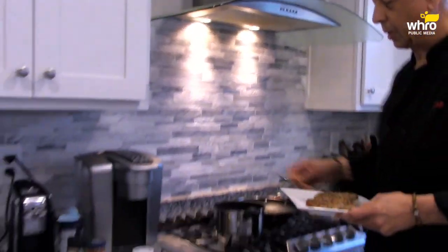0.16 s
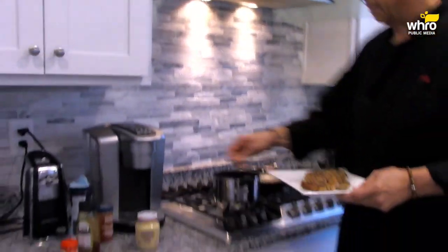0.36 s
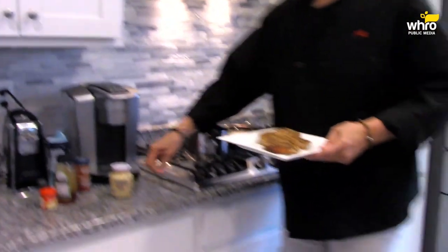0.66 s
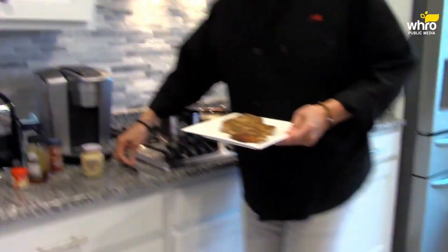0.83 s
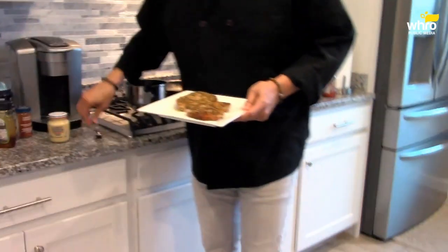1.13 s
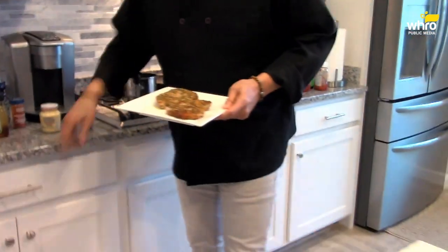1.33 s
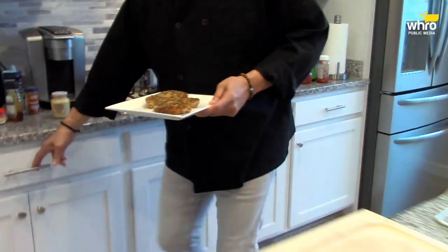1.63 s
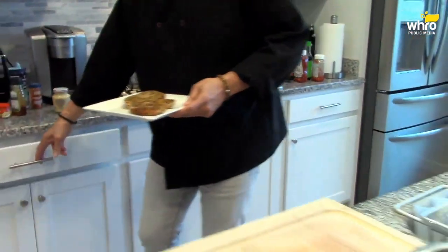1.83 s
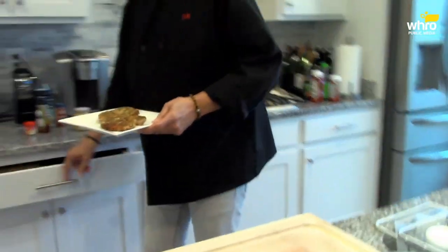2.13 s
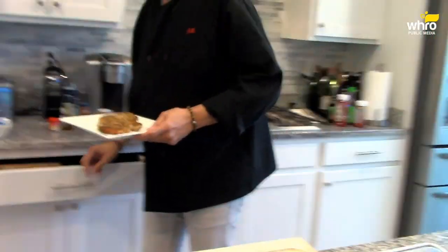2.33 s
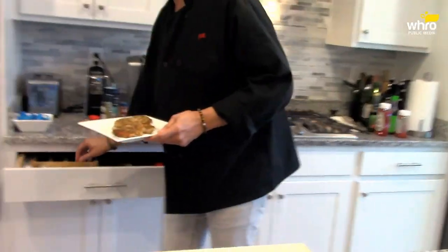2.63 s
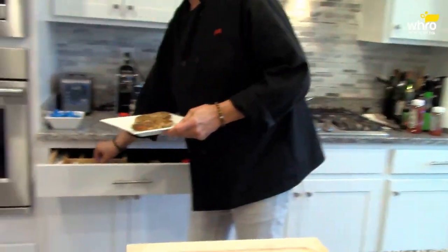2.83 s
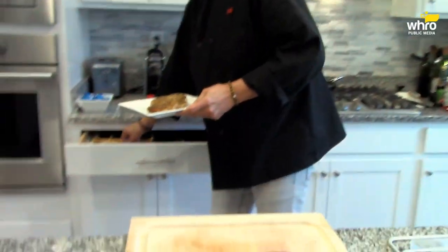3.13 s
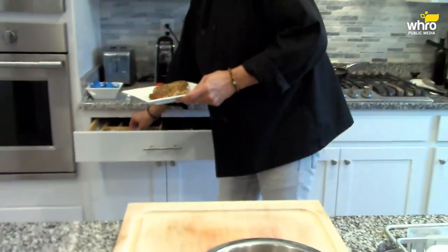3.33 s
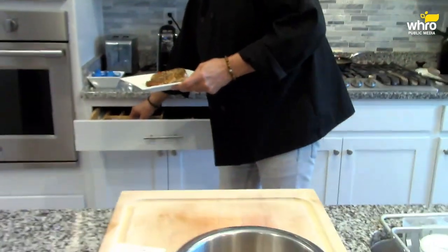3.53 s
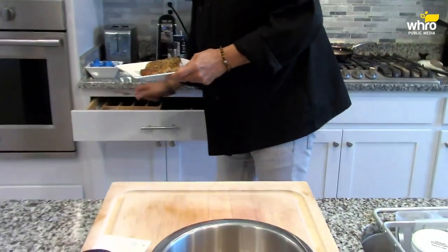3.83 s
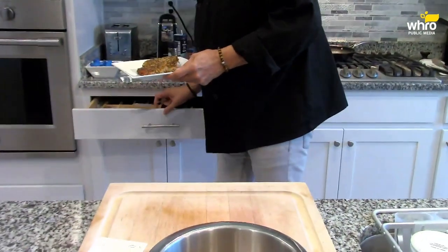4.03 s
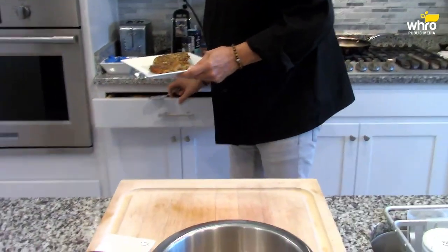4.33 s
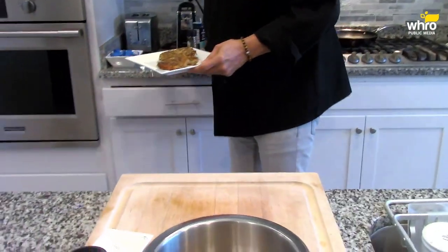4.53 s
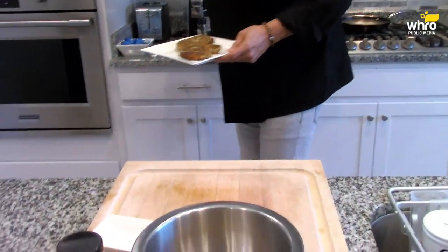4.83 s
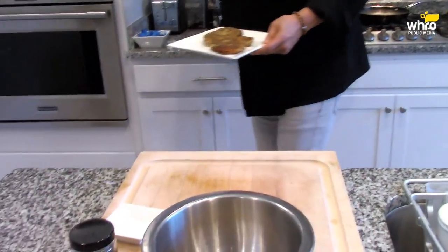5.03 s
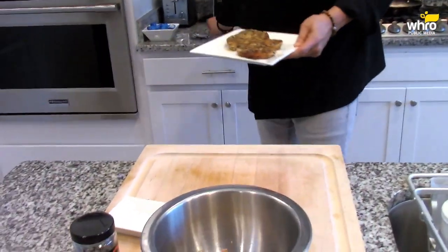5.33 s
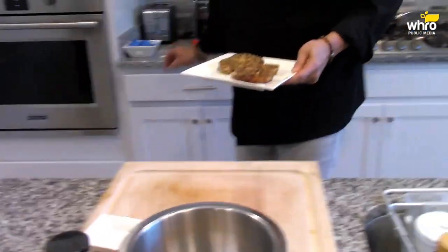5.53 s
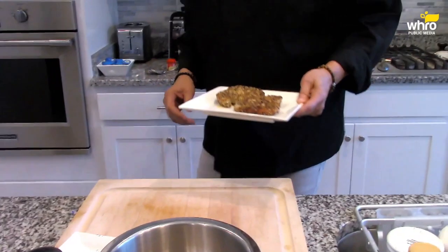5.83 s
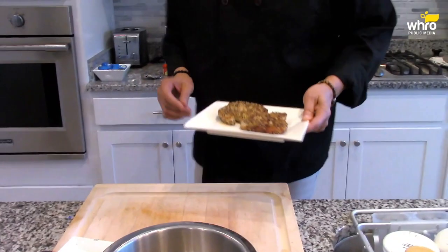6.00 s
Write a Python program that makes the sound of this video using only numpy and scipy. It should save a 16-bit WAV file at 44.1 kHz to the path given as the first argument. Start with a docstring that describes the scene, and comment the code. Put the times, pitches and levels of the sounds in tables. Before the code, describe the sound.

A soft, constant fan rush fills a reflective kitchen. After light touches near the stove, a fork drops in a quick double clink, then comes a dry finger snap. A drawer rolls out hollowly, utensils tumble in a dense metallic rattle, and after a short lull the drawer rolls in and slams, its contents jangling. A spoon then bounces to rest with bright, brief ringing. The microphone is a few steps off, image almost mono.

```python
"""A cooker hood hums in a hard-walled kitchen, with soft rustles and light metal notes that ping by the stove.
A few steps away a cook drops a fork on the stone counter, snaps his fingers and rolls a drawer open.
He rummages in the cutlery, takes out a spoon, lets the drawer crash shut and sets the spoon down ringing.
Blows are short random rattles coloured by the struck body; steel adds fading sine waves; the drawer's
rolling and the hood are shaped noise. Every blow and the rolling drawer get kitchen echoes."""
import sys
import numpy as np
from scipy import signal
from scipy.fft import rfft, irfft, next_fast_len
from scipy.io import wavfile

SR = 44100
rng = np.random.default_rng(int(sys.argv[2]) if len(sys.argv) > 2 else 0)


def generate_wav(sig):
    """Save sig (samples, or channels by samples) to the path in sys.argv[1] as 16-bit PCM at SR."""
    pcm = np.round(np.clip(np.atleast_2d(sig).T, -1, 1) * 32767).astype(np.int16)
    wavfile.write(sys.argv[1], SR, pcm)


N = 271923   # length of the scene in samples
TAIL = np.arange(int(.7 * SR)) / SR   # time in seconds within one echo or ring
# Levels are set before the box resonances, the small trim of each output channel and the peak rounding.
BLOW_SAMPLES = .04 * SR   # a blow's or ping's dB is its average (rms) level if packed into 40 ms

# Knocks of the drawer: first the hand on its handle, then bumps in the runners.
# Each row: start in seconds, level in dB, length in seconds.
DRAWER_KNOCKS = [(1.824, -40.5, 0.0033), (1.998, -36.5, 0.031), (2.15, -40.5, 0.02), (2.432, -34, .014),
                 (2.552, -36.5, 0.01), (2.781, -39, 0.022), (4.184, -43, 0.014), (4.211, -29, 0.016),
                 (4.302, -32, 0.025)]
KNOCK_BASS_DB, KNOCK_TREBLE_DB = -1, -15
# Dull thuds as the drawer's weight starts or stops. Each row: start in seconds, level in dB, length in seconds.
DRAWER_THUDS = [(1.946, -44, .07), (2.988, -51, 0.022), (4.07, -53.5, .015), (4.205, -48, 0.03),
                (4.745, -50, .03), (4.92, -28.5, 0.018)]
THUD_BASS_DB, THUD_TREBLE_DB = 21, -22
# Tone of the drawer's cabinet. Each row: frequency in Hz, strength in dB per Hz (only the shape counts).
CABINET_TONE = [(45, -27.5), (110, -16), (170, -14.5), (400, -5.5), (600, -10.5), (1000, -9), (1700, -10),
                (2400, -10.5), (4500, -10.5), (7000, -10.5), (9300, -14.5), (11500, -19.5), (13000, -26.5),
                (16000, -22)]
# Tone of the rolling runners. Each row: frequency in Hz, strength in dB per Hz (only the shape counts).
RUNNER_TONE = [(29, -85), (50, -39), (125, -7), (212, -8.5), (251, 4.5), (324, -3.5), (368, -3.5),
               (418, -4.5), (898, -8.5), (1810, -19.5), (3210, -22.5), (8000, -74), (10400, -72),
               (17600, -120)]


def drawer():
    """Rollers rumble along the runners; the drawer knocks, thuds and crashes shut with all that is in it."""
    happens = rng.random(N) < 3000 / SR   # 3000 tiny bumps a second on average
    grains = happens * rng.choice([-1, 1], N) * from_db(3 * rng.standard_normal(N))
    path = kitchen(direct_db=-8, near_db=0, near_s=.012)
    rumble = signal.fftconvolve(grains, path)[:N]
    rumble = rms_one(colour(rumble, lambda hz: at_hz(RUNNER_TONE, hz)))
    rumble = from_db(1.5) * drawer_speed() * rumble
    knocks = [(s, db, KNOCK_BASS_DB, KNOCK_TREBLE_DB, length) for s, db, length in DRAWER_KNOCKS]
    thuds = [(s, db, THUD_BASS_DB, THUD_TREBLE_DB, length) for s, db, length in DRAWER_THUDS]
    hits = knocks + thuds + slam()
    return rumble + blows(hits, CABINET_TONE, direct_db=-3.5, near_db=-1.5, near_s=0.025)


# The hand pushes or pulls the drawer. Each row: start in seconds, rumble level in dB before slowing and
# before the 1.5 dB boost in drawer(), rolling time in seconds.
PUSHES = [(1.74, -59, .14), (1.86, -48, 0.3), (2.13, -43.5, .57), (2.76, -50.5, 0.31), (2.96, -47.5, .11),
          (4.0, -55, 0.18), (4.18, -39, .55), (4.73, -51.5, 0.21)]
PUSH_S, FRICTION_DB_PER_S, STOP_S = 0.044, 25.5, 0.025   # it gathers speed, coasts down, comes to rest


def drawer_speed():
    """Each push brings the drawer up to speed; friction slows it until it stops; overlapping pushes add up."""
    speed = np.zeros(N)
    for s, db, length in PUSHES:
        t = np.arange(N) / SR - s
        starting = np.clip(t / PUSH_S, 0, 1)
        stopping = np.clip(1 - (t - length) / STOP_S, 0, 1)
        coasting = from_db(db - FRICTION_DB_PER_S * np.maximum(t - PUSH_S, 0))
        speed += starting * stopping * coasting
    return speed


# The drawer hits its stop. In order: start in seconds, level in dB, extra bass in dB, extra treble in dB.
SLAM = (4.898, -15, 0, -4)
# What each wave loses against the one before. In order: level in dB, bass in dB, treble in dB.
WAVE_LOSS = (0.03, 2.8, 1)
WAVE_GAP_S, WAVE_S, WAVE_GROWTH = .022, 0.03, 1.29   # first gap and length; both grow by this factor


def slam(count=4):
    """The contents crash against the front in waves that spread out and grow thinner and duller."""
    s, hits = SLAM[0], []
    for k in range(count):
        growth = WAVE_GROWTH ** k
        levels_db = np.array(SLAM[1:]) - k * np.array(WAVE_LOSS)
        hits.append((s, *levels_db, WAVE_S * growth))
        s += WAVE_GAP_S * growth
    return hits


# Hollow notes of the drawer box. Each row: frequency in Hz, width in Hz, boost in dB.
BOX_RESONANCES = [(168, 26, 10), (416, 18, 5), (788, 30, 5), (983, 24, 7), (1130, 26, 6), (1540, 60, 3)]


def box(x):
    """The wooden drawer adds its hollow resonances to its rolling, knocks and crash and the tumbling cutlery."""
    def boost_db(f):
        return sum(db / (1 + (2 * (f - hz) / width) ** 2) for hz, width, db in BOX_RESONANCES)
    return colour(x, boost_db)


# Notes of the drawer cutlery. Each row: frequency in Hz before the piece's pitch ratio, level in dB before
# the blow's ring level and a random change, time to fade by 60 dB in seconds before the heap halves it.
CUTLERY_MODES = [(2840, -69, 0.21), (4240, -63, 0.18), (4000, -70, 0.22), (5240, -75, 0.27),
                 (5360, -58, 0.28), (6800, -56, 0.31), (6560, -68, 0.23), (8400, -49.5, 0.057),
                 (8340, -66, 0.21), (9000, -53, 0.098), (10500, -57, 0.25), (11800, -64, 0.19),
                 (11700, -61, 0.25), (12300, -64, 0.2), (13700, -67, 0.2), (14470, -63, 0.15)]
# Tone of the cutlery tray. Each row: frequency in Hz, strength in dB per Hz (only the shape counts).
TRAY_TONE = [(29, -70), (50, -38), (208, -20), (246, -10), (842, -4), (973, 0), (1330, -6), (1660, -4.5),
             (1960, -9), (2880, -7), (3250, -13), (5810, -14.5), (7210, -18.5), (10900, -20), (16000, -31)]


def cutlery():
    """Utensils tumble against each other and their tray; each rings at its own pitch, damped by the heap."""
    def modes_for(blow):
        pitch = blow[6]
        return [(hz * pitch, db + rng.normal(0, 2), t60 / 2) for hz, db, t60 in CUTLERY_MODES]
    return blows(tumbles(), TRAY_TONE, direct_db=-2.0, near_db=2.5, near_s=0.024, modes_for=modes_for)


# Utensils tumble. Each row: start in seconds, contact level in dB, extra treble in dB, ring level in dB,
# pitch ratio of the piece.
CUTLERY_BLOWS = [(2.951, -32.5, -5.5, -27, 1.1), (3.066, -33, 9, -21, 1.2), (3.11, -34, -6, -11, 0.63),
                 (3.133, -25.5, -13, -28, 0.8), (3.199, -36, 2, -1, .82), (3.235, -18, 7, -14, 1.1),
                 (3.283, -23, 8.5, -3, 1.2), (3.34, -25.5, 10.5, -15, 1.3), (3.355, -19, 3, 0, .98),
                 (3.437, -17.5, -0.5, -2, 1), (3.492, -20, -19, 3, .75), (3.611, -21, 4, -1, 0.68),
                 (3.706, -21.5, 7, 13, 1.2)]
TUMBLE_DB, TUMBLE_S, TUMBLE_BASS_DB = -20.5, .018, 4   # a typical tumble: its level, length and extra bass
TUMBLE_DOUBLES_DB, TUMBLE_BASS_PER_DB = 14.5, 1   # this many dB double the length; bass dB per dB of level
SETTLE_AFTER_S, SETTLE_LOSS_DB, SETTLE_S = .042, 17.5, 0.039   # delay, drop in level and length of settling


def tumbles():
    """Weight, taken from the level, sets each tumble's length and bass; a soft rattle follows as it settles."""
    hits = []
    for s, db, treble_db, ring_db, pitch in CUTLERY_BLOWS:
        weight_db = db - TUMBLE_DB
        bass_db = TUMBLE_BASS_DB + TUMBLE_BASS_PER_DB * weight_db
        length = TUMBLE_S * 2 ** (weight_db / TUMBLE_DOUBLES_DB)
        hits.append((s, db, bass_db, treble_db, length, ring_db, pitch))
        soft_db, soft_ring_db = db - SETTLE_LOSS_DB, ring_db - SETTLE_LOSS_DB
        hits.append((s + SETTLE_AFTER_S, soft_db, bass_db, treble_db, SETTLE_S, soft_ring_db, pitch))
    return hits


# Notes of the spoon. Each row: frequency in Hz, level in dB struck on the handle, level in dB struck on the
# bowl (both before the blow's ring level), time to fade by 60 dB in seconds before the grip shortens it.
SPOON_MODES = [(2657, -37, -32, .25), (2842, -39, -37, .35), (3662, -39, -30, .24), (3700, -39, -28, .08),
               (3860, -42, -36, .15), (5038, -31, -39, .65), (5141, -47, -35, .3), (6290, -25, -24, .18),
               (6335, -45, -35, .3), (7560, -45, -41, .35), (8125, -48, -28, .13), (8195, -48, -26, .2),
               (8843, -30, -28, .14), (9274, -40, -19, .19), (10662, -43, -25, .08), (12300, -43, -31, .14),
               (12810, -39, -45, .2), (13560, -50, -42, .25), (13920, -47, -42, .22), (14110, -41, -55, .2)]
# Tone of steel hitting stone. Each row: frequency in Hz, strength in dB per Hz (only the shape counts).
STEEL_ON_STONE = [(50, -26), (130, -13), (280, 0.5), (700, 3), (1300, 1), (2000, -1), (3500, 1.5),
                  (7000, -1.5), (11000, -1), (15000, -18)]


def spoon(grip=1.1):
    """The spoon is knocked, jolted, then bounces to rest; the place struck decides which notes speak."""
    def modes_for(blow):
        place = np.clip(blow[6], 0, 1)
        damping = grip * (1 - place)   # fingers on the handle shorten the high modes most
        modes = []
        for hz, handle_db, bowl_db, t60 in SPOON_MODES:
            level_db = handle_db + place * (bowl_db - handle_db)
            modes.append((hz, level_db, t60 / (1 + damping * (hz / 6500) ** 2)))
        return modes
    return blows(spoon_hits(), STEEL_ON_STONE, direct_db=-4.5, near_db=5.0, near_s=0.03, modes_for=modes_for)


# The spoon is knocked, jolted by the drawer and set down, with one list of bounces for each.
# Each row: start in seconds, contact level in dB, extra treble in dB, ring level in dB,
# place struck from 0 (handle) to 1 (bowl).
SPOON_BLOWS = [
    [(4.821, -20.5, -1, 2.5, 0.13)],
    [(4.951, -26.5, 6, -1.5, 0.027)],
    [(5.293, -24, -1.5, 3.5, 0.96), (5.315, -24, -3.5, 3.5, 0.84), (5.347, -25, -1, -5.5, .06),
     (5.375, -23, -7, -9, 0.51)],
]
HANDLE_BASS_DB, BOWL_BASS_DB = 1, -6.5   # struck on the handle it thumps, on the bowl it hardly does
SPOON_RATTLE_S, SPOON_RATTLE_S_PER_S = 0.00093, 0.16   # first length, and growth per second of bouncing


def spoon_hits():
    """The place struck sets the thump; later bounces stay longer on the stone and chatter."""
    hits = []
    for bounces in SPOON_BLOWS:
        first_s = bounces[0][0]
        for s, db, treble_db, ring_db, place in bounces:
            bass_db = HANDLE_BASS_DB + place * (BOWL_BASS_DB - HANDLE_BASS_DB)
            length = SPOON_RATTLE_S + SPOON_RATTLE_S_PER_S * (s - first_s)
            hits.append((s, db, bass_db, treble_db, length, ring_db, place))
    return hits


# The two ends of the fork land. Each row: start in seconds, contact level in dB, rattle length in seconds.
FORK_BLOWS = [(.923, -32, 0.0018), (.958, -26, 0.0033)]
# Notes of the fork. Each row: frequency in Hz, level in dB before the blow's ring level,
# time to fade by 60 dB in seconds.
FORK_MODES = [(2778, -50, .3), (5012, -35, .25), (5766, -46, .2), (6336, -39, .2), (6480, -43, .12),
              (6848, -46, .15), (9211, -36, .14), (9604, -37, .09), (11390, -43, .1), (11510, -40, .1),
              (14150, -45, .08), (14300, -45, .1)]


def fork(treble_db=3.4, bass_db=2.0, ring_db=-.5):
    """The fork lands on the stone counter, one end after the other, and its steel rings."""
    hits = [(s, db, bass_db, treble_db, length, ring_db) for s, db, length in FORK_BLOWS]
    return blows(hits, STEEL_ON_STONE, direct_db=-7, near_db=3, near_s=.009,
                 modes_for=lambda blow: FORK_MODES)


# The finger leaves the thumb, then hits the palm. Each row: start in seconds, level in dB, length in seconds.
SNAP = [(1.597, -37, 0.0027), (1.6035, -30.5, 0.0013)]
# Tone of the palm. Each row: frequency in Hz, strength in dB per Hz (only the shape counts).
PALM_TONE = [(120, -44), (200, -16), (263, -12), (482, -39), (538, -10.5), (659, 0), (722, -9), (883, -9.5),
             (2090, -10), (3560, 1), (11700, -20.5), (16000, -30)]


def finger_snap():
    """A finger slips off the thumb and hits the palm: two very short rattles with the palm's tone."""
    hits = [(s, db, 0, 0, length) for s, db, length in SNAP]
    return blows(hits, PALM_TONE, direct_db=-6.0, near_db=0.5, near_s=0.0053)


# Soft rustles, a scuff as the fork settles, and small ticks. Each row: start in seconds, level in dB,
# extra treble in dB, length in seconds.
SOFT_TOUCHES = [(0.106, -46, 9, .002), (0.194, -44, 2, 0.031), (0.474, -38.5, 1, 0.042),
                (.515, -40, 2, 0.032), (1.127, -40, -13, .019), (1.732, -40, 1, 0.02),
                (4.537, -54, 15.5, 0.0061), (5.807, -43.5, 1, 0.0035)]
SOFT_BASS_DB = -5.5
# Tone of the soft touches. Each row: frequency in Hz, strength in dB per Hz (only the shape counts).
SOFT_TONE = [(100, -35), (400, 11), (1300, 5.5), (3000, 3), (7000, -7.5), (10000, -12), (16000, -26)]


def soft_touches():
    """Soft rustles, a scuff as the fork settles, and small ticks, all made of many tiny touches."""
    hits = [(s, db, SOFT_BASS_DB, treble_db, length) for s, db, treble_db, length in SOFT_TOUCHES]
    return blows(hits, SOFT_TONE, direct_db=-3, near_db=-2, near_s=0.022)


# Clear notes of metal, at the stove and in the closing drawer. Each row: start in seconds,
# middle frequency in Hz, level in dB (each of three modes gets 6 dB less), time to fade by 60 dB in seconds.
PINGS = [(.192, 6800, -53, 0.022), (0.196, 1270, -50.5, 0.021), (.222, 6270, -51.5, 0.03),
         (.336, 714, -51.5, 0.086), (4.947, 12600, -24.5, .06), (4.952, 9400, -27.5, 0.092)]


def pings(spread=.025):
    """Light touches of metal: three close modes that die away quickly."""
    out = np.zeros(N)
    for s, hz, level_db, t60 in PINGS:
        modes = [(hz * (1 + k * spread), level_db - 6, t60) for k in (-1, 0, 1)]
        add(out, s, ring(modes, kitchen(direct_db=-8, near_db=2, near_s=.012)))
    return out * np.sqrt(BLOW_SAMPLES)


# Tone of the hood's rush. Each row: frequency in Hz, strength in dB per Hz (only the shape counts).
HOOD_TONE = [(15, -44), (25, -38), (70, -12.5), (170, -8), (236, -0.5), (270, -5), (363, -0.5),
             (489, -10.5), (714, -7.5), (863, -13.5), (1260, -15.5), (1650, -17.5), (4740, -24.5),
             (6210, -25.5), (16000, -40)]
HOOD_DB = -51.5   # average (rms) level of the rush
# Hollow note of the duct. In order: frequency in Hz, width in Hz, average (rms) level in dB.
DUCT_NOTE = (294, 210, -62)


def hood():
    """Steady rush of the extractor fan, with noise through a narrow filter as the hollow note of its duct."""
    rush = rms_one(colour(rng.standard_normal(N), lambda hz: at_hz(HOOD_TONE, hz)))
    hz, width, level_db = DUCT_NOTE
    b, a = signal.iirpeak(hz, hz / width, fs=SR)
    duct = signal.lfilter(b, a, rng.standard_normal(N))
    return from_db(HOOD_DB) * rush + from_db(level_db) * rms_one(duct)


# How long the kitchen echoes. Each row: frequency in Hz, time to fade by 60 dB in seconds.
KITCHEN_FADE = [(100, 0.51), (500, 0.51), (2000, 0.47), (5000, 0.41), (9000, 0.32), (15000, 0.16)]


def kitchen(direct_db, near_db, near_s):
    """Path from one spot: straight sound, quick echoes off counter and cabinets, a tail losing treble first."""
    white = rfft(rng.standard_normal(len(TAIL)))
    hz = np.fft.rfftfreq(len(TAIL), 1 / SR)
    tail = 0
    for k, (_, t60) in enumerate(KITCHEN_FADE):
        # this band's share of the spectrum, blending into its neighbours
        share = at_hz([(row[0], j == k) for j, row in enumerate(KITCHEN_FADE)], hz)
        tail = tail + irfft(white * share, len(TAIL)) * dying(t60)
    near = rng.standard_normal(len(TAIL)) * np.exp(-TAIL / near_s)
    path = unit_energy(tail) + from_db(near_db) * unit_energy(near)
    path[0] += from_db(direct_db)
    return unit_energy(path)


def blows(table, spectrum, direct_db, near_db, near_s, modes_for=None):
    """Play each blow from its own spot in the kitchen, with ringing notes if it is steel."""
    # Each row: start in seconds, level in dB, extra bass in dB, extra treble in dB, length in seconds;
    # for steel also ring level in dB and, for some, place struck or pitch ratio.
    out = np.zeros(N)
    for blow in table:
        path = kitchen(direct_db, near_db, near_s)
        add(out, blow[0], contact(blow, spectrum, path))
        if modes_for:
            add(out, blow[0], from_db(blow[5]) * ring(modes_for(blow), path))
    low_cut = signal.butter(2, 110, "high", fs=SR, output="sos")   # every blow, the drawer's thuds and crash included, loses its deepest bass below about 110 Hz
    return signal.sosfilt(low_cut, out) * np.sqrt(BLOW_SAMPLES)


def contact(blow, spectrum, path, per_s=1400, uneven_db=5, first_touch=0.9):
    """A first touch and a short rattle that swells and fades, coloured by the struck body."""
    level_db, bass_db, treble_db, length = blow[1:5]
    signs, strengths = rng.standard_normal((2, 4096))
    t = np.arange(len(signs)) / SR
    swell = np.sin(np.pi * np.minimum(t / length, 1))
    happens = rng.random(len(t)) < per_s / SR
    touches = happens * swell * np.sign(signs) * from_db(uneven_db * strengths)
    touches[0] = first_touch
    heard = unit_energy(signal.fftconvolve(path, touches)[:len(TAIL)])
    lean = [(250, bass_db), (700, 0.0164), (2200, 0.0034), (7000, treble_db)]   # Hz, dB
    # the blow's level refers to the middle of its spectrum
    middle_db = np.mean(at_hz(spectrum, np.linspace(600, 2500, 8)))
    coloured = colour(heard, lambda hz: at_hz(spectrum, hz) + at_hz(lean, hz))
    return from_db(level_db - middle_db) * coloured


def ring(modes, path):
    """Steel modes (Hz, dB, fade time in seconds) ring down; echoes make each swell and beat in its own way."""
    hz, level_db, t60 = np.transpose(modes)[:, :, None]
    signs = rng.choice([-1, 1], hz.shape)
    sines = np.sin(2 * np.pi * hz * TAIL) * dying(t60) * signs
    heard = signal.fftconvolve(sines, path[None], axes=1)[:, :len(TAIL)]
    return np.sum(unit_energy(heard) * from_db(level_db), axis=0)


def dying(t60):
    """Envelope that loses 60 dB in t60 seconds."""
    return np.exp(-np.log(1000) * TAIL / t60)


def colour(x, db_at):
    """Filter with the gain db_at(Hz) in dB that reacts as early as it can (minimum phase)."""
    n = 2 * next_fast_len(len(x) // 2 + 2048)
    hz = np.arange(n // 2 + 1) * SR / n
    cepstrum = irfft(np.log(from_db(db_at(hz))), n)
    # folding the cepstrum forward in time gives the minimum phase
    cepstrum[1:n // 2] *= 2
    cepstrum[n // 2 + 1:] = 0
    response = np.exp(rfft(cepstrum))
    return irfft(rfft(x, n) * response, n)[:len(x)]


def at_hz(points, hz):
    """Read a (Hz, value) table on a log-frequency axis."""
    f, value = np.transpose(points)
    return np.interp(np.log(np.maximum(hz, 1)), np.log(f), value)


def from_db(db):
    """Decibels to gain."""
    return 10 ** (np.asarray(db) / 20)


def unit_energy(x):
    """Scale each row to energy 1."""
    return x / np.sqrt(np.sum(x ** 2, axis=-1, keepdims=True) + 1e-20)


def rms_one(x):
    """Scale to an average (rms) level of 1."""
    return unit_energy(x) * np.sqrt(len(x))


def add(out, s, sound):
    """Mix a sound in at time s in seconds."""
    at = round(s * SR)
    out[at:at + len(sound)] += sound[:N - at]


def side_of(mid, width):
    """The difference between two close capsules: a weak copy, its phases scattered by all-pass delays."""
    for lag in (53, 131, 197):   # samples
        taps = np.r_[.5, np.zeros(lag - 1), 1]
        mid = signal.lfilter(taps, taps[::-1], mid)
    return colour(mid, lambda hz: at_hz(width, hz))


# Stereo width of most sounds. Each row: frequency in Hz, side level minus mid level in dB.
ACTION_WIDTH = [(30, -14), (70, -29), (250, -33), (1000, -41), (2000, -64), (4000, -45.5), (8000, -30),
                (15000, -34.5)]
# Ringing steel reaches the capsules less alike. Each row: frequency in Hz, side minus mid level in dB.
SPOON_WIDTH = [(60, -11.5), (110, -14), (200, -18.5), (380, -19), (700, -24), (1290, -36), (2380, -37.5),
               (4400, -15.5), (8120, -16), (15000, -19)]
# Stereo width of the hood. Each row: frequency in Hz, side level minus mid level in dB.
HOOD_WIDTH = [(60, -11.5), (110, -8), (200, -12.5), (380, -11.5), (700, -9), (1290, -10.5), (2380, -10.5),
              (4400, -26.5), (8120, -38), (15000, -18)]


def scene():
    """Nearly mono; the hood and the ringing spoon are a little wider than the other sounds."""
    action = box(drawer() + cutlery()) + fork() + finger_snap() + soft_touches() + pings()
    steel = spoon()
    rush = hood()
    mid = action + steel + rush
    side = side_of(action, ACTION_WIDTH) + side_of(steel, SPOON_WIDTH) + side_of(rush, HOOD_WIDTH)
    left = (mid + side) * from_db(-1.15)
    right = (mid - side) * from_db(-1.32)
    return np.array([left, right])


CUTOFF_HZ = 15900


def record(dry):
    """The highest peaks are rounded and everything above the cutoff is removed."""
    top = .9   # the rounded signal stays below this
    rounded = top * np.tanh(dry / top)
    low_pass = signal.ellip(10, .1, 80, CUTOFF_HZ, fs=SR, output="sos")
    return signal.sosfilt(low_pass, rounded)


dry = scene()
out = record(dry)
generate_wav(out)
```